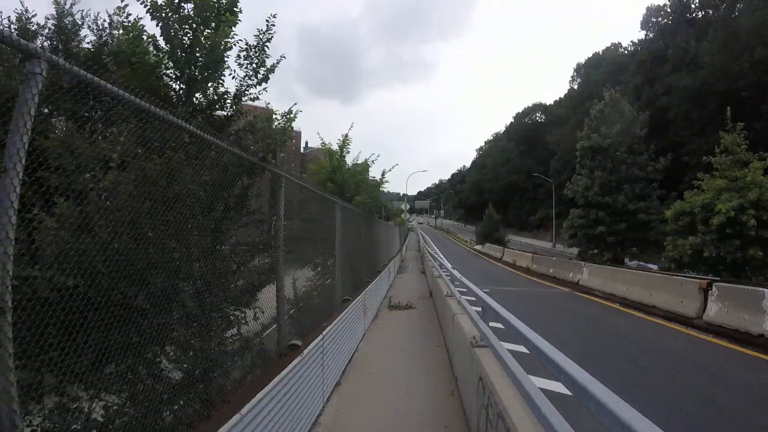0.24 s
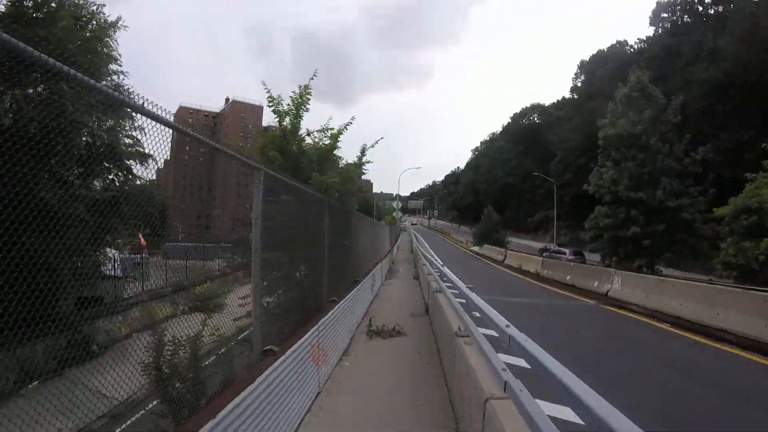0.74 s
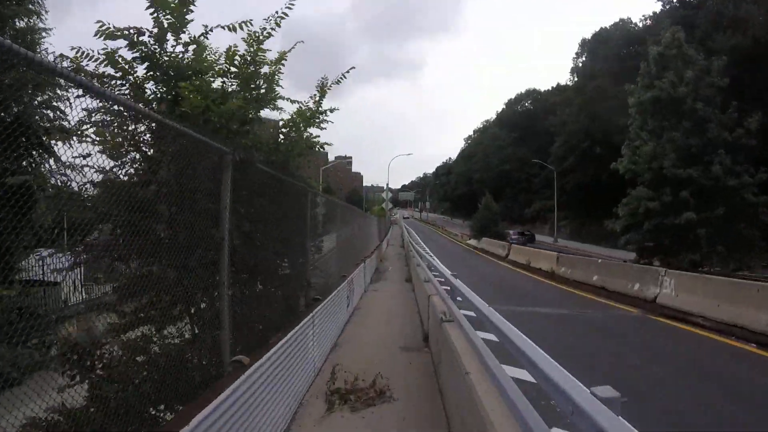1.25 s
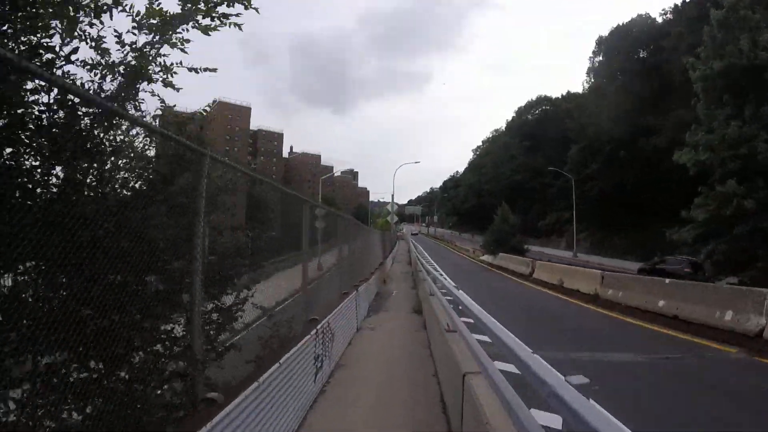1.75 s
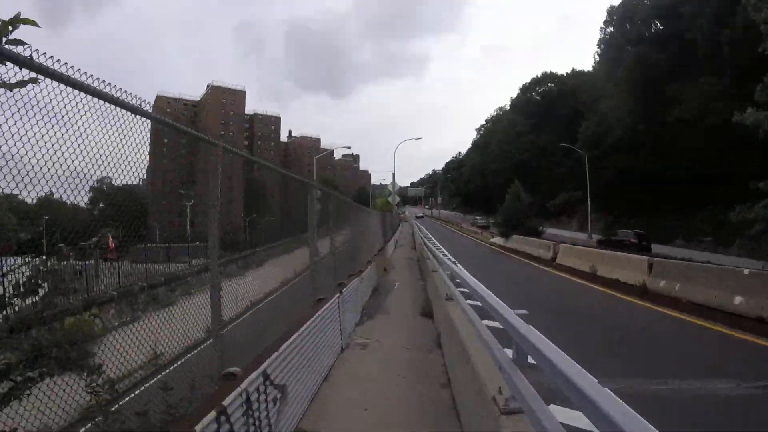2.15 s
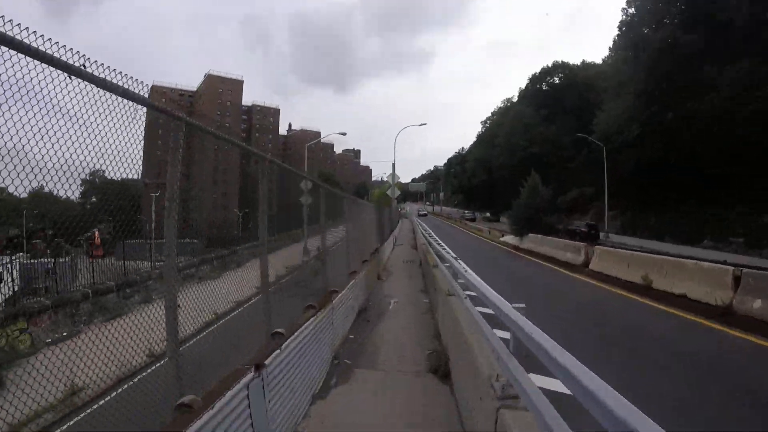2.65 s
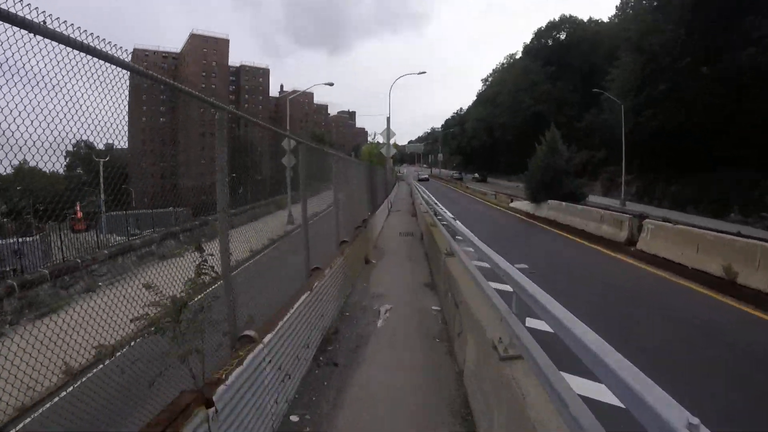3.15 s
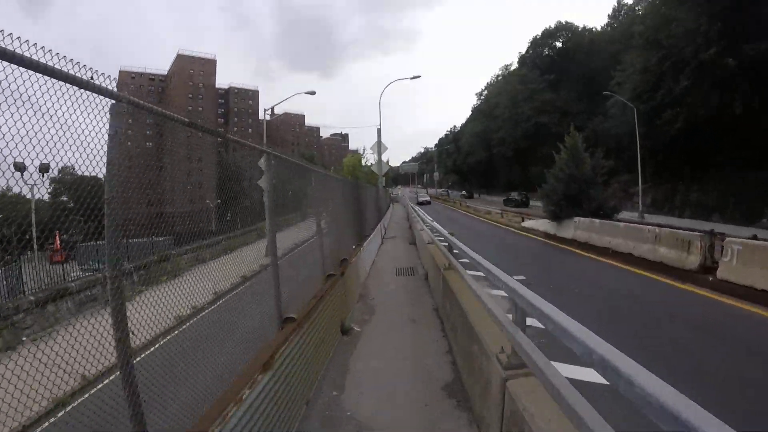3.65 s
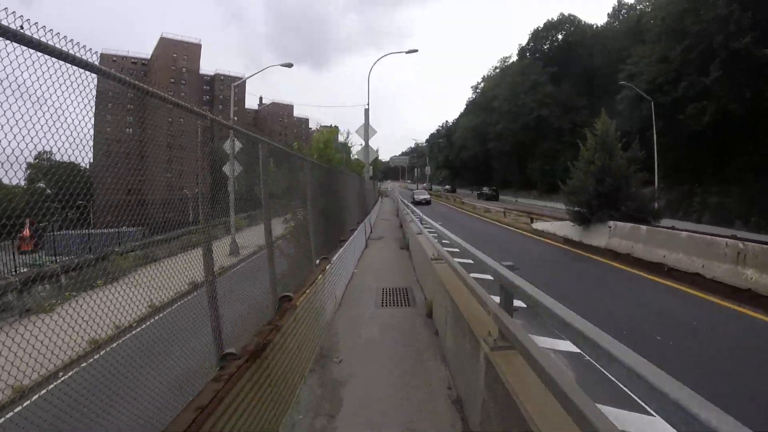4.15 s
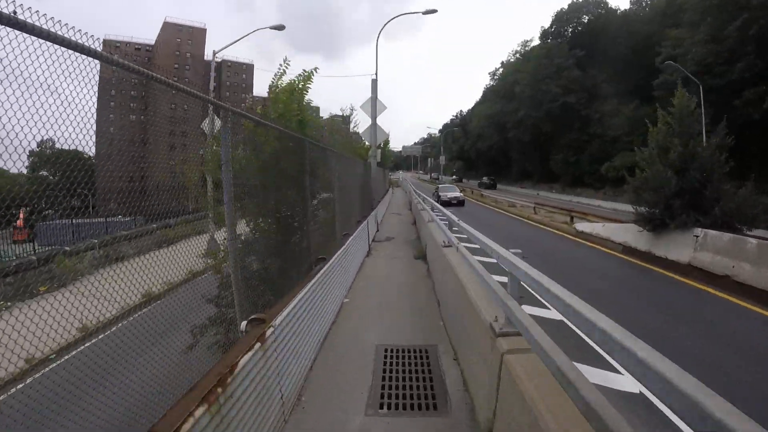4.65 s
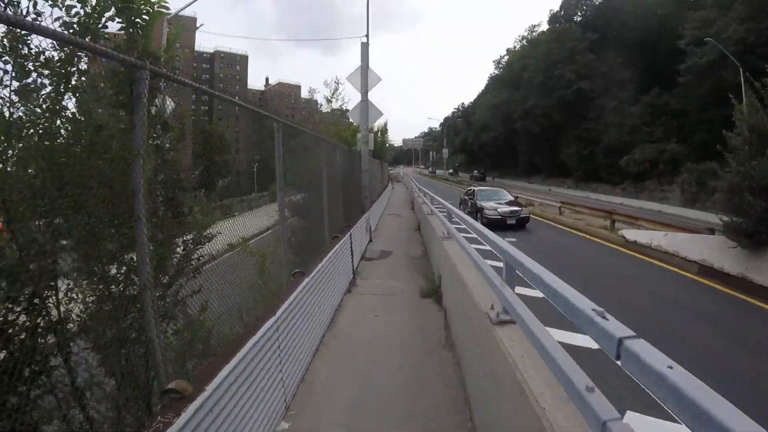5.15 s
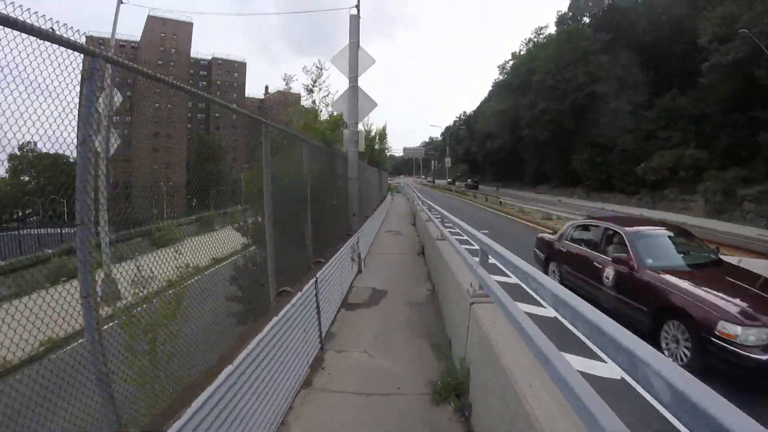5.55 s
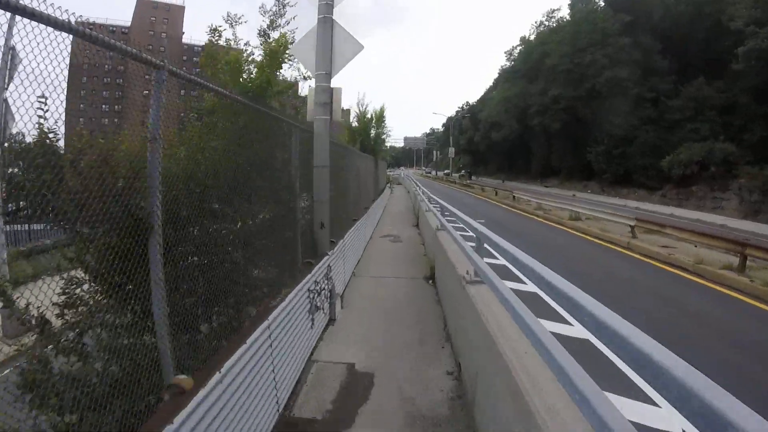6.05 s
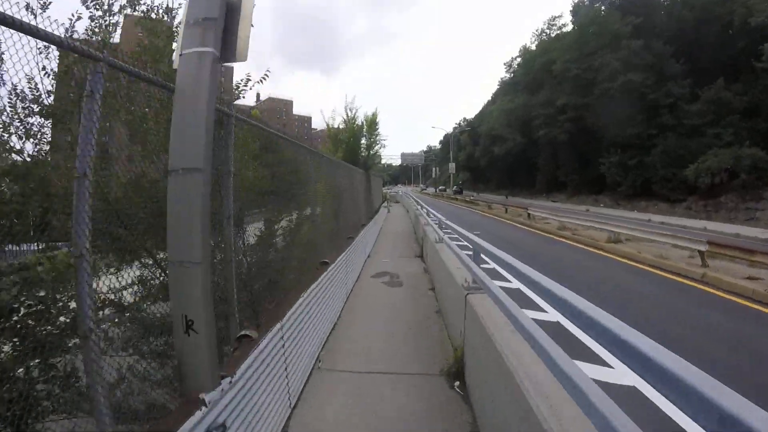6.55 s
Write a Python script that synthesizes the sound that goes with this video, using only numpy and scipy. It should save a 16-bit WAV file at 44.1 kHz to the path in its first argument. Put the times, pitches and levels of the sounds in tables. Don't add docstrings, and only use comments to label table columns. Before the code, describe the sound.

A bicycle rolls over rough concrete, low rumble and hollow plastic rattles throughout, muffled traffic behind, one violent double crack late on.

```python
import sys
import numpy as np
from scipy import signal
from scipy.fft import rfft, irfft, next_fast_len
from scipy.io import wavfile
from scipy.ndimage import uniform_filter1d, map_coordinates

SR = 44100
rng = np.random.default_rng(int(sys.argv[2]) if len(sys.argv) > 2 else 0)


def voltage_ratio(decibels):
    exponent = np.asarray(decibels, float) / 20
    return 10 ** exponent


def log_audio(samples):
    frames = np.atleast_2d(samples).T
    limited = np.clip(frames, -1, 1)
    pcm = np.round(limited * 32767).astype(np.int16)
    wavfile.write(sys.argv[1], SR, pcm)


N = 300321

# start_s, peak_db, pitch_hz
SWINGS = [(0.001, -16, 38.2), (0.18, -28, 59.2), (0.324, -19, 70), (0.599, -15, 100), (0.644, -18, 58.3),
          (0.835, -17, 38), (0.936, -21.5, 67.3), (4.55, -30, 70), (1.213, -23.5, 75), (1.279, -21.5, 63),
          (1.715, -25.5, 62), (2.277, -24, 38), (2.348, -29, 38), (2.539, -26, 69.6), (2.649, -26, 76),
          (2.75, -25, 62), (2.899, -28, 79), (3.403, -21.5, 70), (3.48, -24.5, 56), (3.668, -17, 63),
          (4.015, -24, 61.5), (5.15, -22.5, 37), (5.32, -22, 37.2), (5.451, -38, 37.7),
          (5.547, -17.5, 36.3), (6.013, -35, 61), (6.154, -23.5, 81), (6.333, -25, 59.4),
          (6.435, -28, 35.7), (6.65, -31, 46)]
# centre_hz, width_hz, level_db
HOUSING = [(1436, 357, -6), (1947, 133, 2), (2617, 340, 0), (3062, 140, -0.5), (3428, 127, -5.5),
           (4460, 310, -12.5), (4490, 170, -9)]
# centre_hz, width_hz, level_db
CATCH = [(6030, 200, 3.5), (6770, 120, 2), (7330, 270, -4.5), (8800, 490, -2.5), (10370, 850, -4.5),
         (11430, 310, -3.5), (12200, 280, -18), (14120, 950, -11), (15400, 600, -14)]


def unit(x):
    return x / np.sqrt(np.mean(x ** 2) + 1e-20)


def along(points, hz):
    f, v = np.transpose(points)
    return np.interp(np.log(hz + 1), np.log(f + 1), v, right=-140)


def curves(rows):
    s, *cols = np.transpose(rows)
    return [np.interp(np.arange(N) / SR, s, c) for c in cols]


def wobble(rate):
    knots = rng.standard_normal(int(N * rate / SR) + 4)
    return map_coordinates(knots, [np.arange(N) * rate / SR])


def filtered(x, response):
    m = next_fast_len(len(x) + 8192)
    return irfft(rfft(x, m) * response(np.fft.rfftfreq(m, 1 / SR)), m)[:len(x)]


def resonant(x, modes):
    def body(f):
        total = 0
        for k, (centre, width, db) in enumerate(modes):
            damping = 1j * f * width
            total = total + (-1) ** k * voltage_ratio(db) * damping / (centre * centre - f * f + damping)
        return total

    impulse = np.eye(1, 512)[0]
    return filtered(x, body) / np.abs(filtered(impulse, body)).max()


def rush(spectrum, patchy_db):
    z = signal.stft(rng.standard_normal(N), nperseg=512)[2]
    field = uniform_filter1d(rng.standard_normal(z.shape), 5, 0)
    field = uniform_filter1d(field, 8, 1)
    noise = signal.istft(z * voltage_ratio(patchy_db * unit(field)), nperseg=512)[1][:N]
    return unit(filtered(noise, lambda hz: voltage_ratio(along(spectrum, hz))))


def blows(times, levels_db, chatter_s, touch):
    u = np.arange(200) / SR / chatter_s
    shape = rng.standard_normal((len(times), len(u))) * u * np.exp(-u)
    shape[:, 0] = -touch
    shape *= (voltage_ratio(levels_db) / np.linalg.norm(shape, axis=1))[:, None]
    at = np.round(np.asarray(times) * SR).astype(int)[:, None] + np.arange(len(u))
    return np.bincount(at.ravel(), shape.ravel(), N + SR)[:N]


def softened(x, top_hz):
    return signal.sosfilt(signal.butter(4, top_hz, fs=SR, output="sos"), x)


def ring(t, hz, t60, rise_s):
    return -np.sin(2 * np.pi * hz * t) * voltage_ratio(-60 * t / t60) * (1 - np.exp(-t / rise_s))


def traffic():
    # time_s, level_db
    nearness = [(0.0, -50.5), (0.3, -54.5), (0.74, -52.5), (1.1, -55.5), (1.71, -55.5), (2.48, -54),
                (3.3, -50.5), (3.6, -52.5), (4.48, -55.5), (5.22, -52), (5.42, -48.5), (5.58, -45.5),
                (5.71, -50.5), (5.9, -46.5), (6.16, -47), (6.58, -52.5), (6.81, -54.5)]
    # frequency_hz, level_db
    roar = [(200, -22), (450, -2), (640, -2.5), (850, -3.5), (1050, -2), (1700, -8), (2400, -36),
            (4000, -74)]
    # frequency_hz, level_db
    car = [(1000, -22.5), (1700, -6.5), (2300, -9), (3200, -3.5), (4100, -12.5), (4700, -21), (7000, -46)]
    # frequency_hz, level_db
    tyres = [(2700, -35), (4200, -0.5), (5300, -7), (7300, -6.5), (9600, -12.5), (12200, -17), (15050, -15),
             (15400, -39), (16800, -70)]
    # centre_hz, width_hz, lift_db
    cavities = [(1056, 420, 1), (1473, 280, 7.5), (1930, 330, 11.5), (2478, 570, 9), (3720, 75, 4.5),
                (4070, 190, 2.5), (6100, 1170, 4.5), (8620, 700, 2), (10400, 600, 2.5)]
    near_db, = curves(nearness)
    swing_db = near_db + 54
    flutter = wobble(9)
    air = voltage_ratio(-56.5 + 0.31 * swing_db + 0.36 * flutter) * rush(roar, patchy_db=1.5)
    air += voltage_ratio(near_db - 6.5 + 0.21 * flutter + 0.49 * wobble(25)) * rush(car, patchy_db=2.0)
    air += voltage_ratio(-71 + 0.085 * swing_db + 0.37 * flutter) * rush(tyres, patchy_db=0.1)
    return filtered(air, lambda f: voltage_ratio(sum(db * np.exp(-2 * ((f - c) / w) ** 2) for c, w, db in cavities)))


def wildlife():
    # time_s, pitch_hz, level_db
    bird = [
        [(1.953, 3900, -66), (1.97, 4020, -57), (1.99, 4010, -63), (2.008, 3950, -55), (2.02, 3750, -58)],
        [(2.032, 4100, -58), (2.045, 3930, -51), (2.06, 3780, -56), (2.08, 3670, -56), (2.095, 3540, -53)],
    ]
    # start_s, length_s, centre_hz, width_hz, level_db
    verge = [(2.13, .05, 3900, 200, -65), (2.69, .07, 4000, 350, -58.5), (2.848, 0.19, 3950, 400, -62),
             (2.995, 0.38, 7800, 700, -74), (3.65, .022, 6000, 6900, -59.5), (5.795, 0.73, 6200, 1500, -69)]
    out, t = np.zeros(N), np.arange(N) / SR
    for note in bird:
        hz, db = curves(note)
        sounding = (t > note[0][0]) & (t < note[-1][0])
        phase = 2 * np.pi * np.cumsum(hz) / SR
        out += sounding * voltage_ratio(db + 0.3 + 2.5 * wobble(90)) * np.sin(phase)
    for s, length, centre_hz, width_hz, db in verge:
        band = filtered(rng.standard_normal(N), lambda f: np.exp(-2 * ((f - centre_hz) / width_hz) ** 2))
        swell = np.sin(np.pi * np.clip((t - s) / length, 0, 1)) ** 0.6
        out += voltage_ratio(db) * unit(band) * swell
    return out


def shake():
    # time_s, level_db
    roughness = [(0.0, -33), (0.36, -42), (0.64, -34), (0.85, -27.5), (1.05, -37), (1.3, -40.5),
                 (1.99, -39), (2.35, -35.5), (2.6, -38.5), (3.1, -43.5), (3.5, -36.5), (4.17, -38.5),
                 (4.5, -42.5), (5.08, -45.5), (5.4, -37), (5.8, -43), (6.25, -36.5), (6.81, -39.5)]
    # frequency_hz, density_db
    fork = [(8, -21), (16, -1), (28, -12), (46, -14), (70, -6.5), (95, -15), (140, -32), (300, -67)]
    # frequency_hz, density_db
    tyre_drum = [(60, -31), (110, -0.5), (200, -5.5), (330, -7.5), (420, -13.5), (700, -44)]
    surge_db, fade_s = 24.5, 0.051
    rough_db, = curves(roughness)
    s, db, _ = np.transpose(SWINGS)
    since = np.arange(N) / SR - s[:, None]
    surge = 1 + voltage_ratio(db + surge_db) @ ((since > 0) * np.exp(-np.abs(since) / fade_s))
    lumps = wobble(16)
    bounce = unit(voltage_ratio(1.8 * lumps) * rush(fork, patchy_db=3.0))
    drum = unit(voltage_ratio(2.2 * lumps + 2.3 * wobble(30)) * rush(tyre_drum, patchy_db=-0.5))
    drum_db = -53 + 0.28 * (rough_db - rough_db.mean())
    return voltage_ratio(rough_db - 2.5) * bounce + voltage_ratio(drum_db) * np.sqrt(surge) * drum


def heaves():
    out, t = np.zeros(N + SR), np.arange(SR // 5) / SR
    for s, db, hz in SWINGS:
        out[round(s * SR):][:len(t)] += voltage_ratio(db + 1.5) * ring(t, hz, t60=0.11, rise_s=0.011)
    return out[:N]


def knocks():
    # start_s, peak_db, pitch_hz
    thumps = [(.0002, -19, 1700), (0.013, -34, 1930), (0.018, -33, 1600), (0.217, -40, 1640),
              (0.318, -33.5, 1810), (0.5748, -37, 1500), (0.618, -25, 1720), (0.632, -35, 1750),
              (0.8199, -28.5, 1550), (0.862, -28.5, 1830), (0.9407, -32.5, 1530), (0.96, -33.5, 1830),
              (1.2195, -39.5, 1990), (1.3735, -38, 1770), (1.7072, -37, 1730), (2.258, -36.5, 1920),
              (2.7144, -36, 1880), (3.3262, -38, 1620), (3.3976, -32, 1830), (3.632, -36, 1620),
              (4.4855, -31.5, 1715), (5.373, -36, 1960), (5.653, -27, 1710), (5.9534, -38, 1770),
              (6.0306, -30, 1790), (6.357, -37, 2040), (6.3674, -35, 1880), (6.3744, -35, 1930),
              (6.659, -27, 1776), (6.755, -39, 1930)]
    out, t = np.zeros(N + SR), np.arange(900) / SR
    for s, db, hz in thumps:
        out[round(s * SR):][:len(t)] += voltage_ratio(db + 11.5) * ring(t, hz, t60=0.0075, rise_s=0.00072)
    return out[:N]


def contacts():
    # landing_s, flight_ms, lift_db, landing_db
    rocks = [(0.3028, 8.2, -42, -21.5), (0.4222, 8.5, -38.5, -26.5), (0.543, 5.2, -39, -21.5),
             (0.6575, 6.5, -42, -19.5), (0.754, 6.4, -41.5, -19.5), (0.8733, 8.5, -42, -20.5),
             (0.9837, 8.3, -38, -21.5), (1.2494, 8.8, -42, -23), (1.516, 11.2, -45, -24),
             (1.738, 5.4, -37.5, -21), (1.9495, 14.6, -50, -33), (2.2042, 11.5, -42.5, -25),
             (2.406, 9, -44, -21.5), (2.6171, 9.3, -44, -22.5), (2.9017, 14, -42.5, -26),
             (3.025, 10.1, -48, -40), (3.111, 14.4, -42.5, -36), (3.524, 10.1, -44, -30),
             (3.8359, 10.5, -58, -30.5), (4.2382, 19.4, -46, -31), (5.22, 11.3, -35.5, -26.5)]
    # start_s, level_db, latch_over_usual_db
    seats = [(0.1994, -29, -5), (0.3588, -25.5, -4), (0.5005, -35, 0), (1.1416, -34.5, -5),
             (1.623, -32.5, -5), (1.682, -36.5, 3), (2.0805, -31.5, -2), (2.1076, -41, 3),
             (2.2771, -29, -7), (3.2657, -24.5, -4), (3.3752, -24, -7), (3.478, -22.5, 0.5),
             (3.5608, -32.5, 1.5), (3.7475, -24, -1), (4.0929, -29.5, 2), (4.2948, -33, 1.5),
             (4.4564, -29.5, -5), (4.6072, -26.5, -2.5), (4.7211, -30.5, 0), (4.996, -39, 3),
             (5.0757, -22.5, -1), (5.2756, -26, -3), (5.4251, -27.5, -3), (5.533, -35.5, -2.5),
             (5.6042, -19.5, -2), (6.0474, -24.5, 3), (6.2108, -27.5, 0), (6.3972, -23.5, -1.5),
             (6.613, -28, 0), (6.7238, -41, 2)]
    # start_s, level_db
    touches = [(0.076, -43.5), (1.1148, -45.5), (1.3105, -55.5), (1.3974, -47), (3.3536, -57),
               (3.449, -53.5), (3.7032, -38.5), (3.9666, -54), (4.048, -42.5), (5.4838, -41), (5.5745, -39),
               (5.7464, -52), (5.8, -49), (6.0147, -46), (6.1667, -38.5), (6.2729, -40.5), (6.37, -45),
               (6.799, -43.5)]
    # start_s, spacing_s, scatter_s, level_db, latch_over_usual_db
    shiver = (3.656, .0024, .0008, -34, -8)
    start_s, spacing_s, scatter_s, shiver_db, over_db = shiver
    firm = seats + [(s, db, 0) for s, _, _, db in rocks]
    for k in range(7):
        s = start_s + k * spacing_s + scatter_s * rng.normal()
        firm.append((s, shiver_db + 2 * rng.normal(), over_db))
    light = touches + [(s - ms / 1000, db) for s, ms, db, _ in rocks]
    return [(s, db - 16.5 + extra, db) for s, db, extra in firm] + [(s, db, db + 8) for s, db in light]


def rattle():
    # centre_hz, width_hz, level_db
    tongue_modes = [(4420, 270, 2), (6110, 340, 3), (6620, 200, 0.5), (7330, 200, -27), (8360, 710, -2.5),
                    (11800, 500, -18), (13500, 900, -15)]
    # centre_hz, width_hz, level_db
    bracket_modes = [(150, 84, -2), (330, 88, 0.5)]
    s, latch_db, shell_db = np.transpose(contacts())
    firm = np.clip((shell_db - latch_db - 5.5) / 14, 0.05, 0.95)
    seat_db = latch_db + 10 * np.log10(firm)
    tongue_db = latch_db + 10 * np.log10(1 - firm)
    shell = resonant(blows(s, shell_db, chatter_s=0.0003, touch=4.5), HOUSING)
    shell = softened(shell, 4760)
    seat = resonant(blows(s, seat_db, chatter_s=0.0002, touch=2.3), CATCH)
    tongue = resonant(blows(s, tongue_db, chatter_s=0.0006, touch=2.9), tongue_modes)
    push = softened(blows(s, shell_db - 16, chatter_s=0.00049, touch=8.5), 860)
    return shell + seat + tongue + resonant(push, bracket_modes)


def bumps():
    # start_s, thud_db, crack_db, rattle_db, thud_pitch_hz
    jolts = [
        (0.6028, -20, -34, -70, 194),
        (0.6156, -26, -44, -70, 330),
        (5.6379, 0.5, -24, -55, 275),
        (5.6387, -18.5, -6.5, -48, 680),
        (5.691, -9, 0.5, -35, 225),
        (5.6943, -10.5, -10, -31, 345),
        (5.7056, -15, -20, -55, 217),
        (5.7114, -16, -12.5, -31, 330),
    ]
    # pitch_hz, level_db, t60_s
    frame_modes = [(132, -20, 0.086), (194, 3, 0.019), (578, -25, 0.043), (1337, -5.5, 0.022),
                   (1436, -1, 0.017), (1600, -2, 0.013), (1880, -16, 0.017)]
    # start_s, level_db
    kicks = [
        (5.6377, -10),
        (5.7044, -17.5),
        (5.7127, -39),
    ]
    out, t = np.zeros(N + SR), np.arange(SR // 5) / SR
    frame = sum(voltage_ratio(db) * ring(t, f, t60, 0.0043) for f, db, t60 in frame_modes)
    for s, thud_db, _, _, hz in jolts:
        thud = ring(t, hz, t60=0.036, rise_s=0.001)
        out[round(s * SR):][:len(t)] += voltage_ratio(thud_db - 1) * (thud + frame)
    for s, db in kicks:
        out[round(s * SR):][:len(t)] -= voltage_ratio(db) * ring(t, 68, t60=0.13, rise_s=0.0011)
    s, _, crack_db, rattle_db, _ = np.transpose(jolts)
    crack = resonant(blows(s, crack_db, chatter_s=0.0004, touch=5.5), HOUSING)
    struck = softened(softened(out[:N], 5500) + crack, 3070)
    return struck + resonant(blows(s, rattle_db, chatter_s=0.0007, touch=1.9), CATCH)


def scene():
    outside = traffic() + wildlife()
    bicycle = shake() + heaves()
    mount = knocks() + rattle() + bumps()
    return (outside + bicycle + mount)[None]


def roll_off(x):
    return signal.sosfilt(signal.butter(12, 16300, fs=SR, output="sos"), x)


def record(dry):
    # start_s, depth_db, recovery_s
    duck = (5.716, -7, 0.16)
    s, depth_db, recovery_s = duck
    since = np.arange(N) / SR - s
    dip = np.clip(since / 0.032, 0, 1) * np.exp(-np.abs(since) / recovery_s)
    ducked = dry[0] * voltage_ratio(depth_db * dip)
    port = filtered(ducked, lambda f: 1 / (1 + (f / 15500) ** 40))
    clipped = port / (1 + np.abs(port) ** 12) ** (1 / 12)
    return roll_off(clipped[None])


dry = scene()
out = record(dry)
log_audio(out)
```